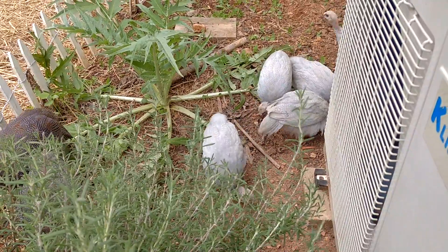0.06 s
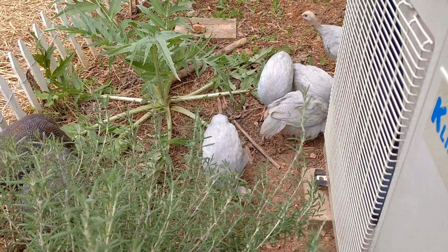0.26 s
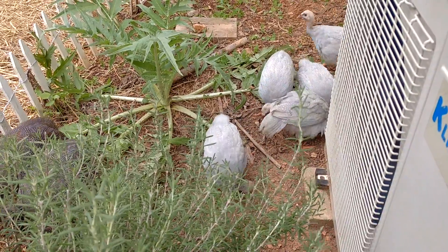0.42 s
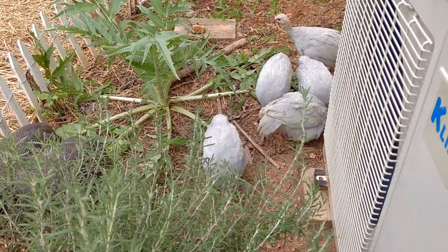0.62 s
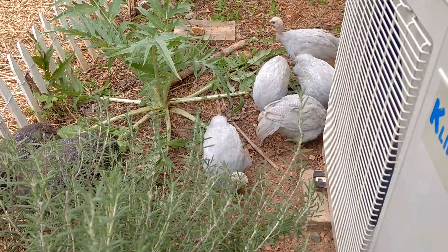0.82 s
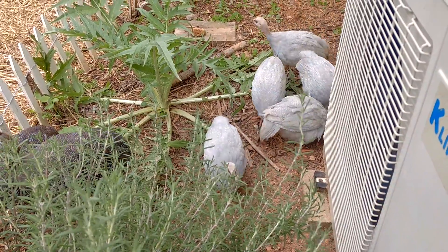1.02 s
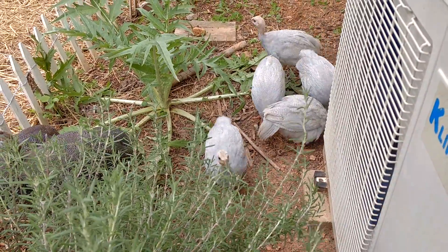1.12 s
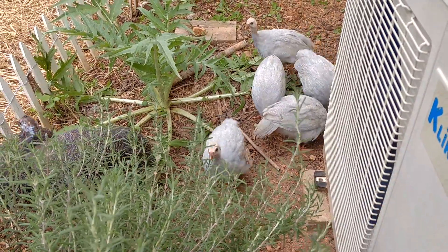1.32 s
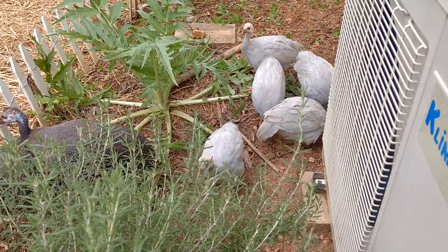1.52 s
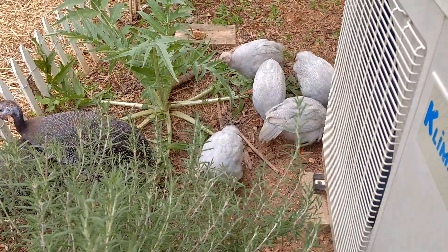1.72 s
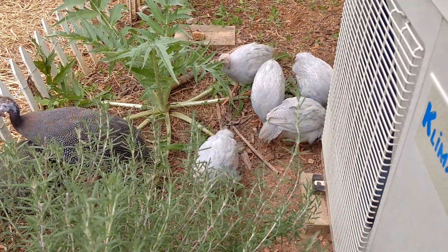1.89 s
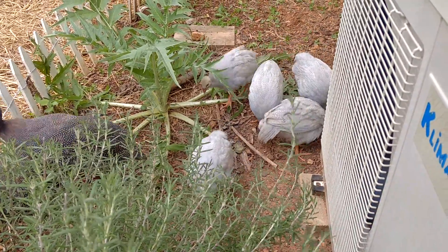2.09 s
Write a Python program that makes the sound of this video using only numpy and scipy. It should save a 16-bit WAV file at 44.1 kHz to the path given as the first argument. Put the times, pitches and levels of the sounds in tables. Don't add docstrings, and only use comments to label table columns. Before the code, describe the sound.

In an outdoor garden bed, guinea fowl peep and cluck in short clusters, ending with a whistle and sharp cluck; twigs tick, leaves rustle, a fan rushes low, and air bumps the close stereo microphone.

```python
import sys
import numpy as np
from scipy import signal
from scipy.fft import rfft, irfft, next_fast_len
from scipy.io import wavfile
from scipy.ndimage import uniform_filter1d

SR = 44100
rng = np.random.default_rng(int(sys.argv[2]) if len(sys.argv) > 2 else 0)


def elevation(decibels):
    levels = np.asarray(decibels, float)
    return 10 ** (levels / 20)


def int16_out(signal):
    q = np.round(np.clip(np.atleast_2d(signal).T, -1, 1) * 32767)
    wavfile.write(sys.argv[1], SR, q.astype(np.int16))


N = 94815


def read(points, hz):
    f, value = np.transpose(points)
    return np.interp(np.log(hz + 1), np.log(f + 1), value)


def add(mix, s, sound, lean):
    part = mix[:, max(round(s * SR), 0):][:, :len(sound)]
    part += np.outer([1, lean], sound)[:, :part.shape[1]]


def drift(size, count):
    x = rng.standard_normal(count + 400)
    x = uniform_filter1d(uniform_filter1d(x, size), size)
    return (x / x.std())[:count]


def along(length):
    return np.linspace(0, 1, round(length * SR))


WAVER, WOBBLE = 0.0028, 0.1
EDGE_S, SWELL = 0.0085, .7


def tone(hz, db, overtones_db, skew=1):
    u = np.linspace(0, 1, len(hz))
    waver = 1 + WAVER * drift(size=60, count=5000)[:len(u)]
    turn = 2 * np.pi * np.cumsum(hz * waver) / SR
    from_end_s = np.minimum(u, 1 - u) * len(u) / SR
    ends = np.sin(np.pi / 2 * np.clip(from_end_s / EDGE_S, 0, 1)) ** 2
    wobble = 1 + WOBBLE * drift(size=120, count=5000)[:len(u)]
    swell = np.sin(np.pi * np.clip(u ** skew, .001, .999)) ** SWELL
    partials = sum(elevation(o) * np.sin((k + 1) * turn) for k, o in enumerate(overtones_db))
    return elevation(db) * ends * wobble * swell * partials


# (t/s, length/s, level/dB, f/Hz, final rise as a share of pitch)
CLUCKS = [
    (.252, 0.056, -28, 1268, 0.12),
    (.303, 0.014, -36, 1416, -0.041),
    (0.416, 0.019, -30.5, 1120, -0.15),
    (0.742, 0.023, -41.5, 868, -0.11),
    (1.152, .056, -22, 1263, 0.19),
    (1.206, 0.013, -33, 1465, -0.1),
    (1.854, .016, -21.5, 1419, -0.0058),
]
# (f/Hz, level/dB)
THROAT = [(800, 5.5), (1500, -2.5), (2200, -11.5), (2700, -9), (3300, -2), (4000, -14), (4600, -28),
          (6000, -33)]
DIP, RISE_POWER, CLUCK_LEAN, RASP_DB = 0.055, 2.9, -0.78, -19
LONG_SKEW, END_KICK = .68, .8
SOFT_DULL = .7


def clucks():
    out = np.zeros((2, N))
    for s, length, db, hz, rise in CLUCKS:
        u = along(length)
        track = hz * (1 + rise * u ** RISE_POWER + DIP * np.exp(-u / 0.068))
        long = length > .04
        dull_db = long * SOFT_DULL * (db + 22) * (1.5 - 1.4 * u)
        colour = [read(THROAT, k * track) + (k > 1.5) * dull_db for k in (0.97, 2.04, 3.15, 4.14)]
        voice = tone(track, db, colour, LONG_SKEW if long else 1)
        voice *= 1 + long * END_KICK * np.exp(-((u - .85) / .09) ** 2)
        rasp = 1 + elevation(RASP_DB) * drift(size=16, count=5000)[:len(u)]
        add(out, s, voice * rasp, CLUCK_LEAN)
    return out


PEEP_LEAN, PEEP_SKEW, PEEP_OCTAVE_DB = -.3, 1.4, -29

# (t/s, length/s, level/dB, f/Hz, lean to the left -1..1)
HELD = [(.04, 0.04, -45.5, 1543, 0.81), (0.036, .03, -43, 2156, 0), (0.157, 0.044, -52.5, 1550, .5),
        (0.148, 0.063, -41, 2274, 0), (0.196, 0.064, -28.5, 1640, 0.87), (.256, .022, -34, 1650, .87),
        (0.234, 0.039, -35, 2290, 0), (0.713, 0.045, -38.5, 2355, -0.51), (.72, .038, -50, 3120, -.3),
        (.922, 0.043, -36.5, 2278, -.4), (.935, 0.025, -37, 1547, .6), (.937, 0.025, -36.5, 1267, 0.35),
        (1.078, 0.03, -31, 2230, -.4), (1.106, .03, -31, 2270, -.4), (1.14, .022, -35, 2230, -.4),
        (1.16, .016, -38, 1680, .7), (1.856, .012, -33, 1060, -.5), (1.081, 0.079, -34, 1278, 0.56),
        (1.088, 0.062, -33.5, 1558, .6), (1.118, 0.044, -27.5, 1628, 0.7), (.985, 0.034, -44, 3580, -.2),
        (1.855, .014, -36, 3860, -0.31)]


def held_peeps(out):
    for s, length, db, hz, lean in HELD:
        steady = np.full(len(along(length)), float(hz))
        add(out, s, tone(steady, db, [0], PEEP_SKEW), lean)


# (t/s, length/s, level/dB, from f/Hz, to f/Hz)
SLIDES = [(0.17, 0.032, -43, 3800, 3600), (.186, .052, -43.5, 3680, 3040), (.432, 0.041, -43, 2600, 2300),
          (.95, 0.044, -49, 5250, 4600), (.986, 0.036, -36, 4650, 3560), (1.014, .024, -45, 3700, 2800),
          (1.012, .028, -42, 2600, 2100), (1.036, .028, -44, 2480, 2300), (1.128, .03, -46, 2850, 3050),
          (1.168, .02, -44, 1700, 1950), (1.905, .03, -52, 3350, 3600), (1.433, .057, -52, 2630, 2200),
          (1.547, 0.0204, -51, 3950, 3680), (1.914, 0.042, -43, 4450, 3500), (1.948, .022, -50, 3550, 3150),
          (1.838, .014, -46, 3700, 3250), (1.84, .012, -43, 3200, 2850), (1.553, 0.023, -43, 2630, 2540)]
FRAY, FRAY_HZ = .18, 250


def sliding_peeps(out):
    for s, length, db, from_hz, to_hz in SLIDES:
        fray = 1 + FRAY * drift(size=round(SR / FRAY_HZ / 4), count=5000)[:round(length * SR)]
        glide = from_hz + (to_hz - from_hz) * along(length)
        add(out, s, fray * tone(glide, db, [0], PEEP_SKEW), PEEP_LEAN)


# (t/s, length/s, level/dB, top f/Hz, place of the top 0-1)
ARCHES = [
    (0.5876, 0.067, -29, 2580, .56),
    (1.508, .055, -33, 2830, .56),
    (.395, 0.041, -36.5, 2350, .55),
    (1.9, 0.063, -59, 2470, .3),
]
ARCH_SAG = .75


def arched_peeps(out):
    for s, length, db, hz, top in ARCHES:
        arch = hz * (1 - ARCH_SAG * (along(length) - top) ** 2)
        add(out, s, tone(arch, db, [0, PEEP_OCTAVE_DB + 2 * (db + 31)]), PEEP_LEAN)


# (t/s, f/Hz, level/dB)
WHISTLE = [
    (1.758, 2160, -43),
    (1.775, 2680, -47),
    (1.789, 2950, -42),
    (1.815, 3000, -38),
    (1.835, 3260, -48.5),
    (1.846, 3023, -48.5),
    (1.855, 2780, -29),
    (1.866, 2730, -56),
]


def whistle(out):
    t, hz, db = np.transpose(WHISTLE)
    at = np.arange(t[0], t[-1], 1 / SR)
    hz, db = (uniform_filter1d(np.interp(at, t, v), size=200) for v in (hz, db))
    turn = 2 * np.pi * np.cumsum(hz) / SR
    wobble = 1 + WOBBLE * drift(size=100, count=8000)[:len(at)]
    voice = np.sin(turn) + elevation(PEEP_OCTAVE_DB) * np.sin(2 * turn)
    add(out, t[0], elevation(db) * wobble * voice, PEEP_LEAN)


# (t/s, length/s, level/dB)
HOARSE = [
    (0.193, 0.2, -41.5),
    (0.657, 0.12, -39.5),
    (1.08, .14, -33.5),
    (1.834, .06, -36.5),
]


def hoarse_breath(out):
    throat = signal.butter(2, [1900, 4200], "band", fs=SR)
    for s, length, db in HOARSE:
        breath = signal.lfilter(*throat, rng.standard_normal(9000))[:round(length * SR)]
        add(out, s, elevation(db) * np.sin(np.pi * along(length)) * breath, PEEP_LEAN)


BIRD_LAG = .44


def birds():
    out = clucks()
    held_peeps(out)
    sliding_peeps(out)
    arched_peeps(out)
    whistle(out)
    hoarse_breath(out)
    out[1] += BIRD_LAG * signal.hilbert(out[0], next_fast_len(N))[:N].imag
    return out


ECHO_DB, ECHO_T60_S = -18, .08


def echoes(x):
    t = np.arange(4000) / SR
    sparse = rng.standard_normal((2, 4000)) * (rng.random((2, 4000)) < .2)
    taps = sparse * elevation(-60 * t / ECHO_T60_S) * (t > .003)
    taps /= np.linalg.norm(taps[0])
    return x + elevation(ECHO_DB) * signal.fftconvolve(x[:1], taps, axes=1)[:, :N]


# (t/s, level/dB, ring f/Hz)
TICKS = [
    (.33, -32, 13000),
    (.752, -30, 11000),
    (.987, -38, 13000),
    (1.09, -23, 6500),
    (1.495, -30, 13000),
    (1.861, -30, 4800),
    (1.871, -24, 13200),
    (1.8993, -28.5, 6500),
    (1.907, -38, 13000),
]
TICK_T60_S = 0.0042


def twig_ticks(out):
    t = np.arange(600) / SR
    for s, db, hz in TICKS:
        snap = np.sin(2 * np.pi * hz * t) + .6 * rng.standard_normal(600)
        add(out, s, elevation(db - 60 * t / TICK_T60_S) * np.diff(snap, prepend=0) / 2, -.8)


# (t/s, level/dB, f/Hz, lean -1..1)
BUMPS = [(.343, -12, 121, -0.45), (0.37, -18.5, 99, 0.43), (.39, -26, 85, 0.68), (0.511, -16.5, 132, -.3),
         (1.27, -24, 65, -0.1), (.04, -24, 60, 0), (1.6, -24, 60, 0), (1.388, -17.5, 111, -0.45),
         (1.578, -23, 169, -.6), (1.598, -20.5, 202, -0.72), (1.611, -18.5, 242, -0.69),
         (1.64, -20, 100, -0.48)]
BUMP_CYCLES = 1.28


def port_bumps(out):
    t = np.arange(-1500, 1500) / SR
    for s, db, hz, lean in BUMPS:
        swell = np.exp(-(t * hz / BUMP_CYCLES) ** 2 * 4)
        add(out, s + t[0], -elevation(db) * swell * np.cos(2 * np.pi * hz * t), 0.93 * lean)


def beyond(points, hz):
    outside = (hz > points[-1][0] * 1.05) | (hz < points[0][0] * .7)
    return read(points, hz) - 60 * outside


def air(mid, side, side_db, like, turn, curve, patchy_db, flicker_db, size):
    hop = size // 4
    frames, hz = N // hop + 5, np.fft.rfftfreq(size, 1 / SR)
    a, b, c, d, patch = rng.standard_normal((frames, len(hz), 5)).T
    patch = uniform_filter1d(uniform_filter1d(patch, size=8, axis=0), size=9, axis=1)
    field_db = patchy_db * patch / patch.std() + flicker_db * drift(size=3, count=frames)
    field_db = field_db + np.interp(np.arange(frames) * hop / SR, *np.transpose(curve))
    common, own = a + 1j * b, c + 1j * d
    same = np.clip(read(like, hz), -1, 1)[:, None]
    turned = np.exp(1j * read(turn, hz))[:, None] * common
    mid_z = elevation(beyond(mid, hz))[:, None] * common
    side_z = elevation(beyond(side, hz) + side_db)[:, None] * (same * turned + np.sqrt(1 - same ** 2) * own)
    z = np.array([mid_z, side_z]) * elevation(field_db) * np.sqrt(SR / size)
    return signal.istft(z, nperseg=size, noverlap=size - hop)[1][:, :N]


# (f/Hz, level/dB)
FAN_MID = [(30, -82), (52, -54), (110, -46.5), (350, -70), (600, -71), (1900, -91), (3800, -91),
           (4700, -106)]
# (f/Hz, level/dB)
FAN_SIDE = [(30, -86), (120, -69), (250, -78.5), (500, -79), (1000, -78.5), (2000, -86), (3800, -89),
            (4700, -102)]
# (f/Hz, correlation -1..1)
FAN_LIKE = [(60, 0.97), (700, 0.71), (1500, 0.65), (4000, 0.52)]
# (f/Hz, phase/rad)
FAN_TURN = [(170, 2.76), (500, 4.8), (1000, 5.4), (1600, 3.2)]
# (t/s, level/dB)
FAN_SURGE = [
    (0, -3),
    (.35, 2.5),
    (.9, 0.5),
    (1.42, 1),
    (1.55, -5),
    (2.15, -1.5),
]


def fan_rush():
    return air(FAN_MID, FAN_SIDE, 0, FAN_LIKE, FAN_TURN, FAN_SURGE, patchy_db=1.98, flicker_db=0.07, size=1024)


# (f/Hz, level/dB)
FAN_LINES = [
    (120, -40.5),
    (150, -46),
]


def fan_hum(out):
    for hz, db in FAN_LINES:
        level = elevation(db + 4.2 * drift(size=3000, count=N))
        pitch = hz + 3 * drift(size=3000, count=N)
        add(out, 0, level * np.sin(2 * np.pi * np.cumsum(pitch) / SR), -.15)


# (f/Hz, correlation -1..1)
TREBLE_LIKE = [(5000, -.3), (6000, -.65), (8000, -.5), (11000, -.8)]
NO_TURN = [(1, 0)]  # (f/Hz, phase/rad)
# (f/Hz, level/dB)
LEAVES = [(3000, -110), (4700, -100), (6000, -95), (6800, -96), (9500, -95.5), (11000, -95), (13000, -90),
          (15500, -89)]
# (t/s, level/dB)
STIR = [(0, -3), (.2, -1), (.32, 5.5), (.42, 4), (.74, 8.5), (.79, 2.5), (1.04, 8), (1.09, 13.5),
        (1.13, 6.5), (1.3, 1), (1.42, 10), (1.53, -2), (1.75, -3.5), (1.8, 3), (1.92, 1.5), (2.15, -1.5)]


def leaf_rustle():
    return air(LEAVES, LEAVES, 0.5, TREBLE_LIKE, NO_TURN, STIR, patchy_db=0.7, flicker_db=1.12, size=256)


# (f/Hz, level/dB)
INSECTS = [(6600, -110), (7300, -92), (7900, -85.5), (8300, -86.5), (8900, -110)]


def insect_hiss():
    steady = [(0, 0), (3, 0)]
    return air(INSECTS, INSECTS, 3, TREBLE_LIKE, NO_TURN, steady, patchy_db=1.3, flicker_db=0.2, size=512)


def scene():
    mix = echoes(birds())
    twig_ticks(mix)
    port_bumps(mix)
    mix += fan_rush() + leaf_rustle() + insect_hiss()
    fan_hum(mix)
    mid, side = mix
    return np.array([mid + side, mid - side])


# (f/Hz, gain)
CROSS = [(100, .95), (2000, .975), (4400, .99), (6800, .985), (9000, .68), (10000, .9), (11200, .6),
         (14000, .42)]
CROSS_S, EDGE_HZ = 0.0004502, 15850


def cross_ports(dry):
    size = next_fast_len(N + 512)
    hz, z = np.fft.rfftfreq(size, 1 / SR), rfft(dry, size)
    leak = read(CROSS, hz) * np.exp(-2j * np.pi * hz * CROSS_S)
    z = (z - leak * z[::-1]) * np.clip((EDGE_HZ - hz) / 250, 0, 1)
    return irfft(z, size)[:, :N]


def roll_off(x):
    return signal.sosfilt(signal.butter(12, 16330, fs=SR, output="sos"), x)


def record(dry):
    mix = cross_ports(dry) + 0.0029
    return roll_off(mix)


dry = scene()
out = record(dry)
int16_out(out)
```